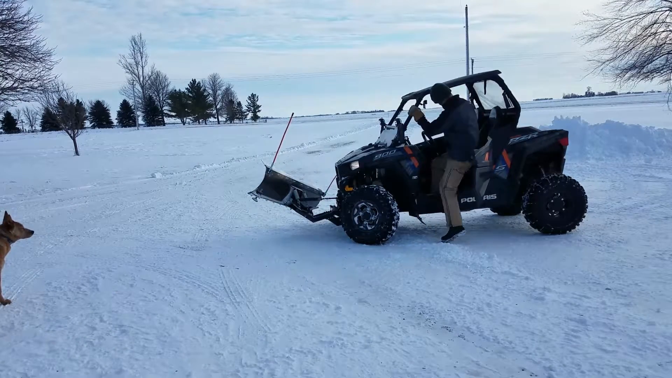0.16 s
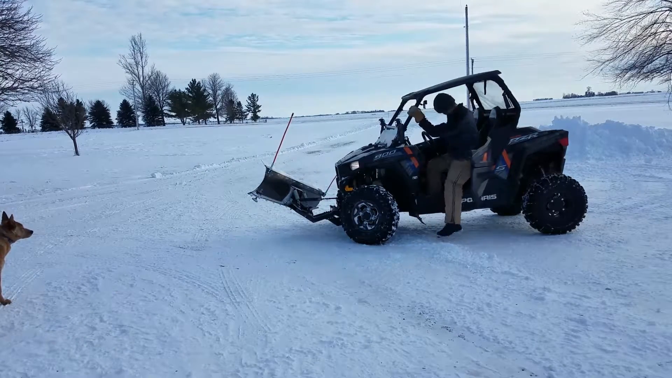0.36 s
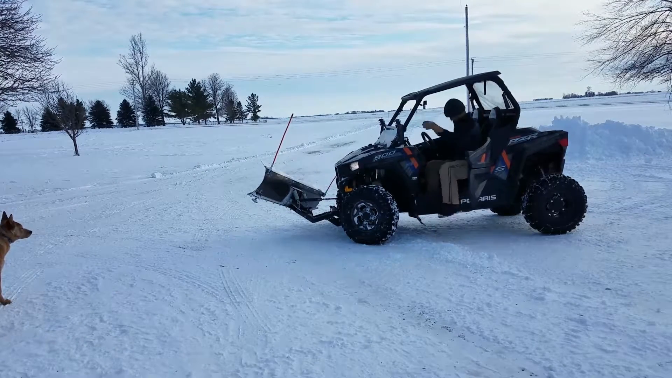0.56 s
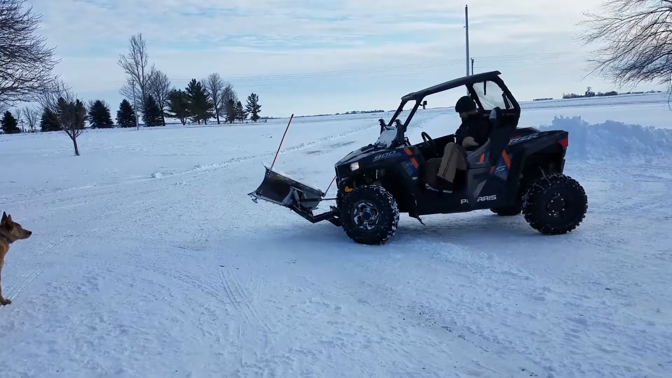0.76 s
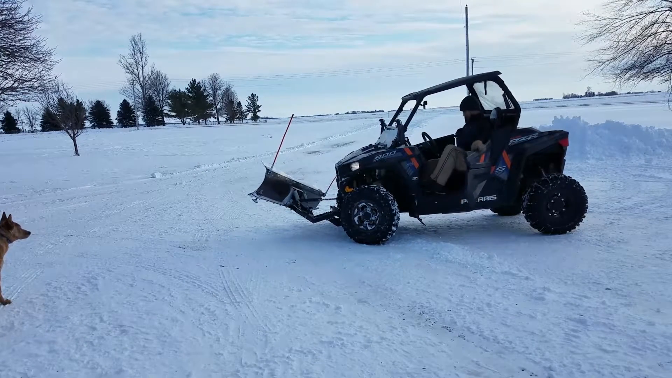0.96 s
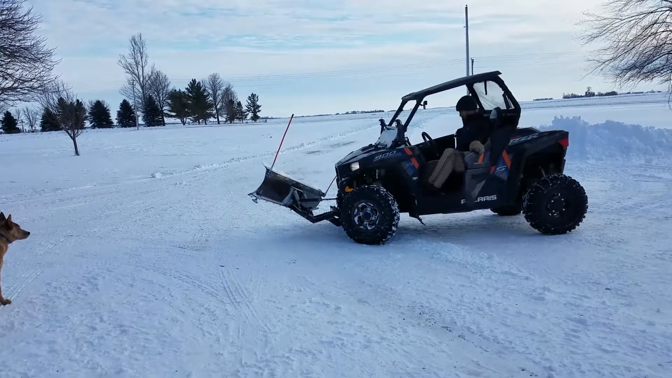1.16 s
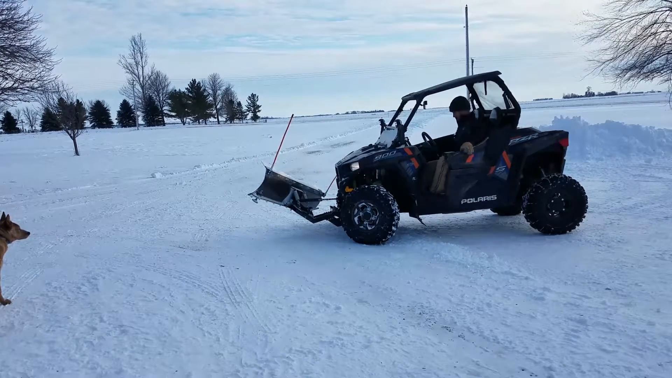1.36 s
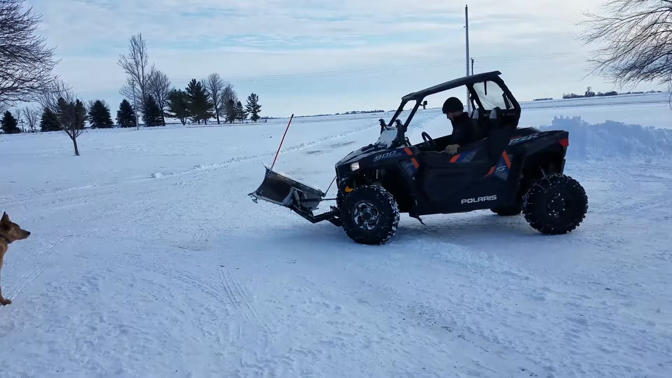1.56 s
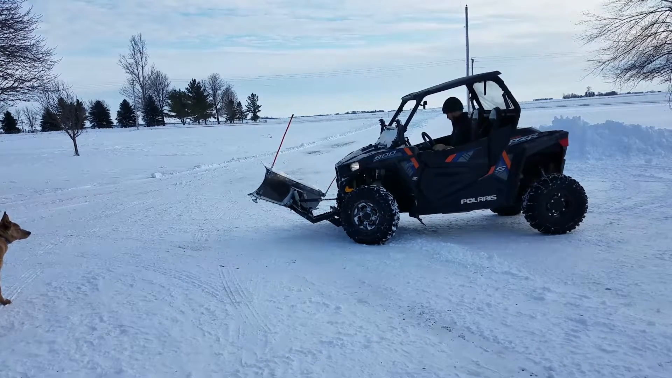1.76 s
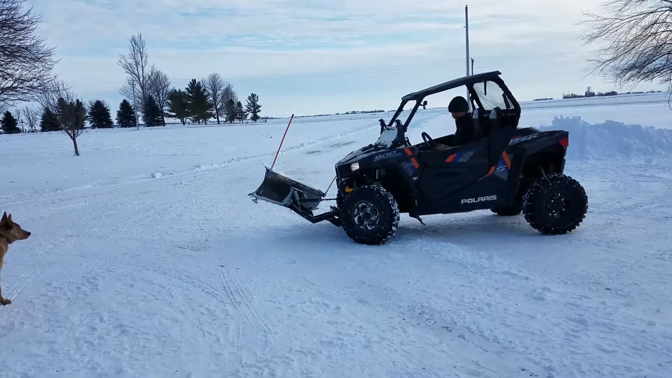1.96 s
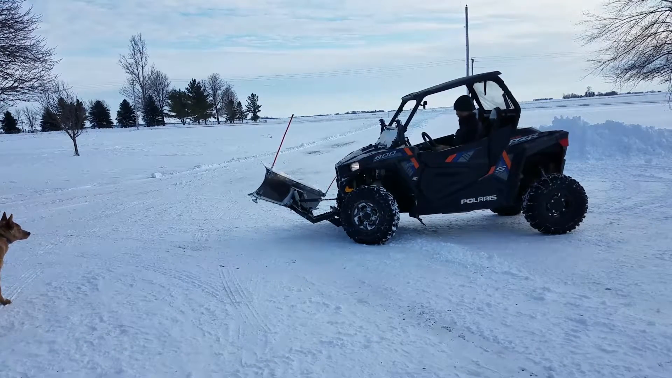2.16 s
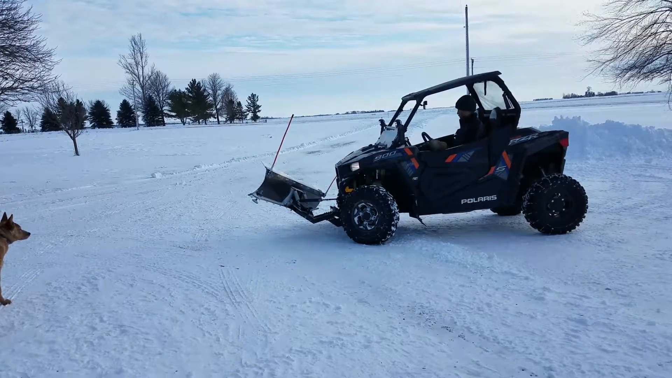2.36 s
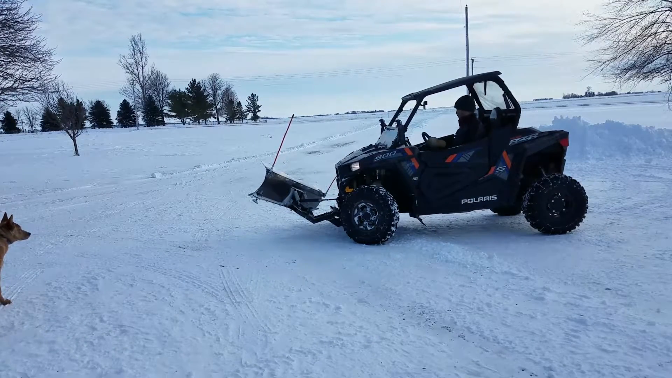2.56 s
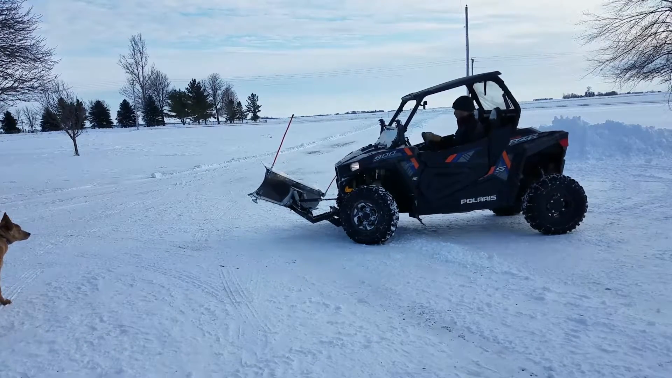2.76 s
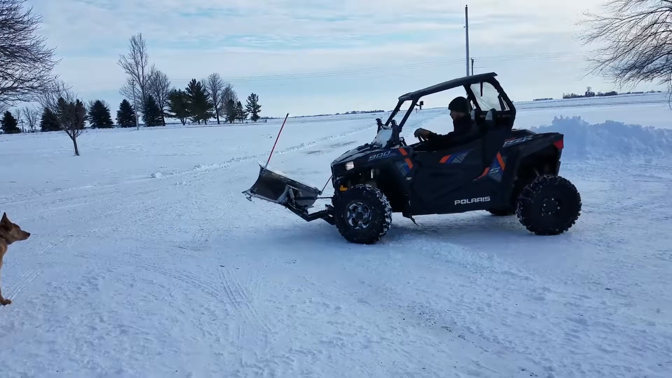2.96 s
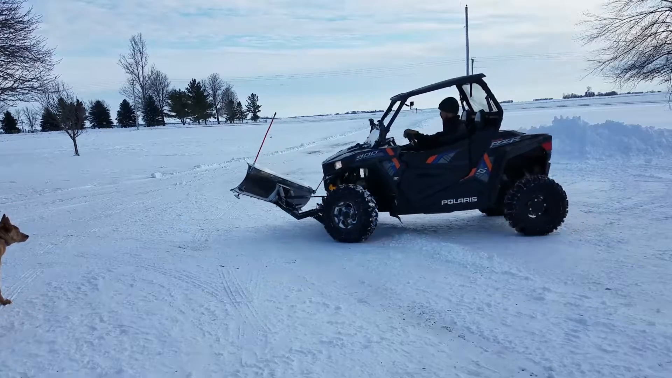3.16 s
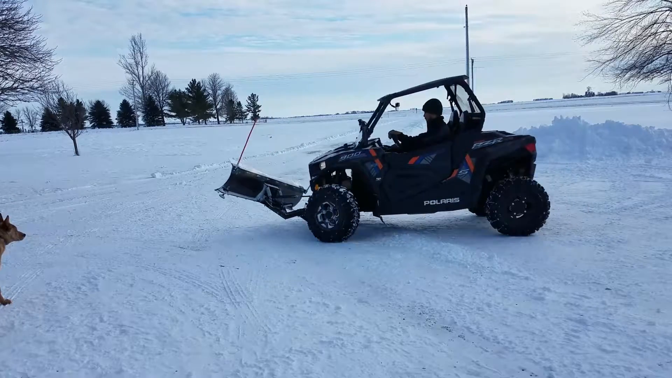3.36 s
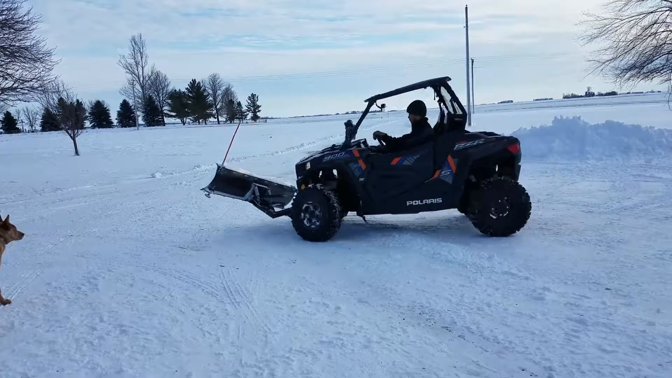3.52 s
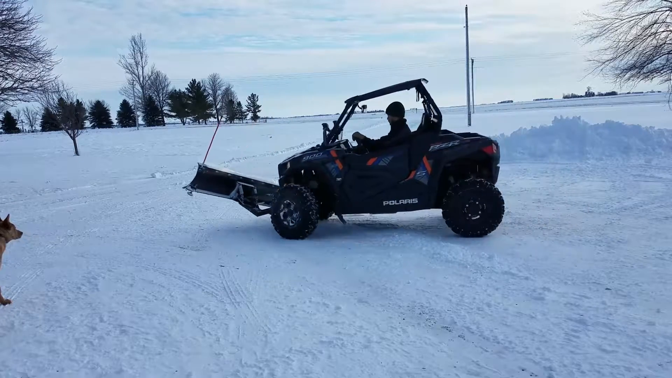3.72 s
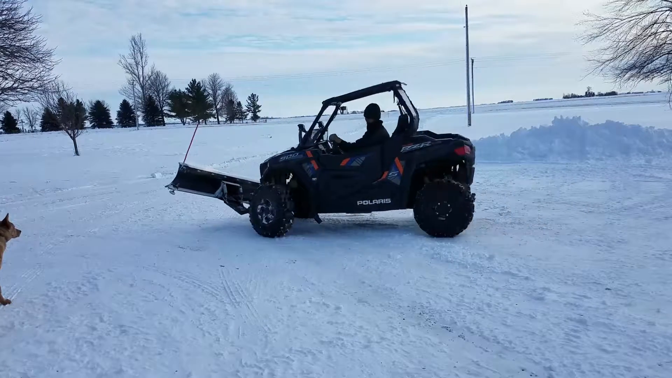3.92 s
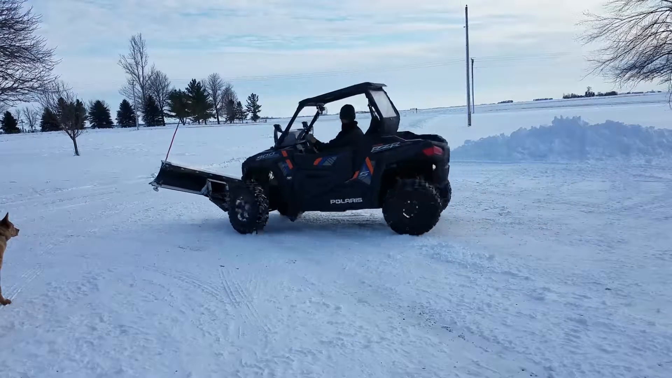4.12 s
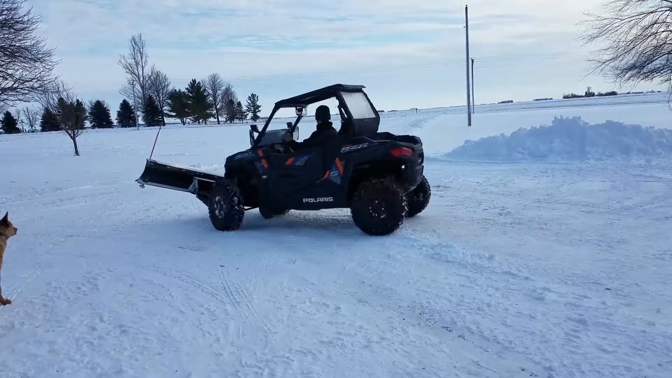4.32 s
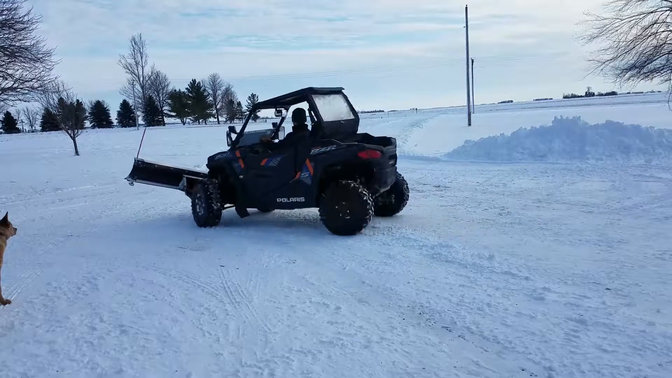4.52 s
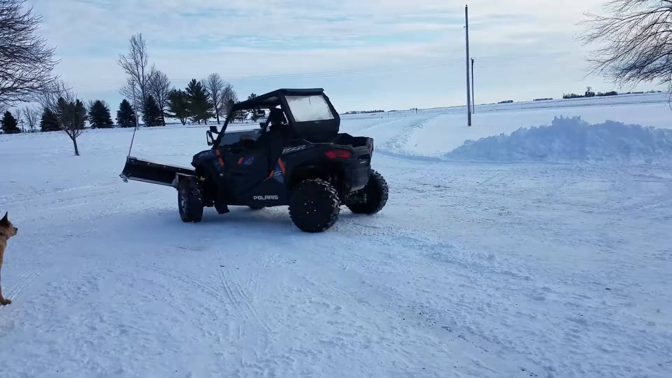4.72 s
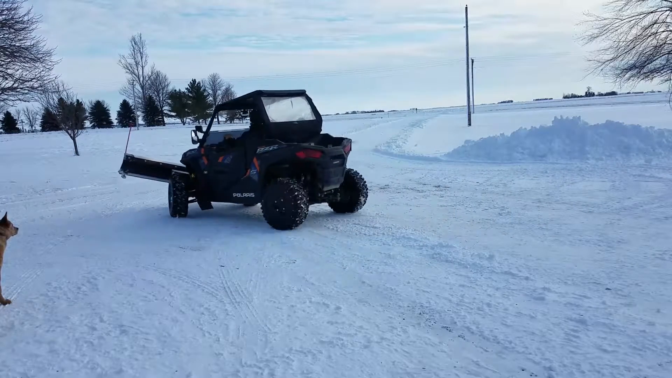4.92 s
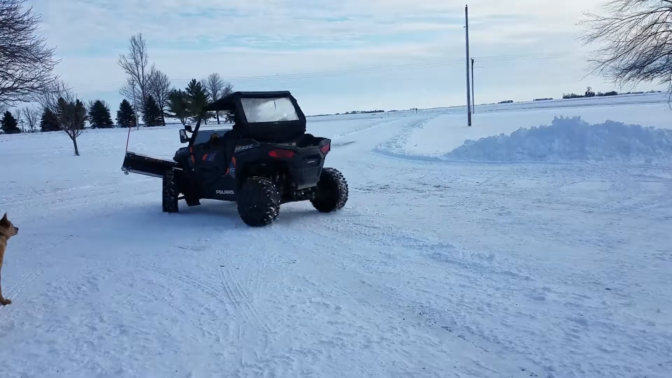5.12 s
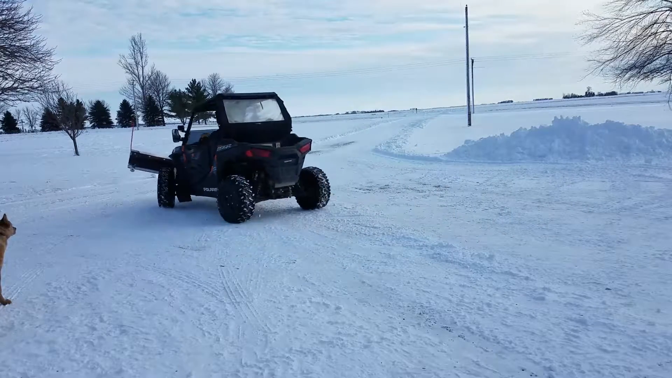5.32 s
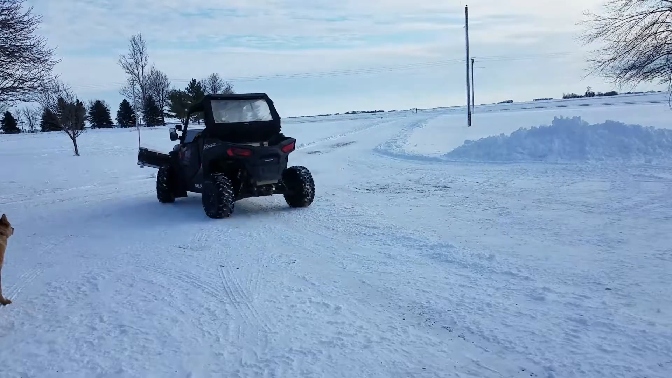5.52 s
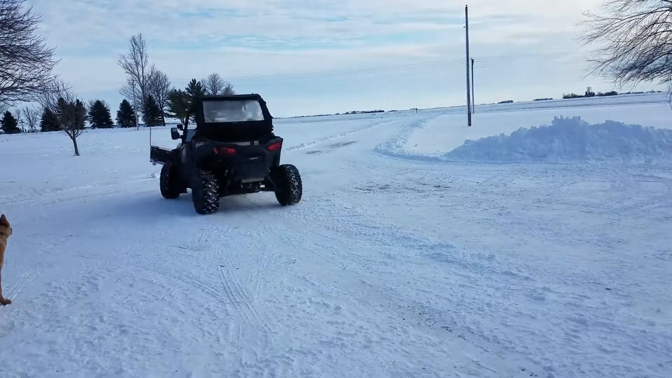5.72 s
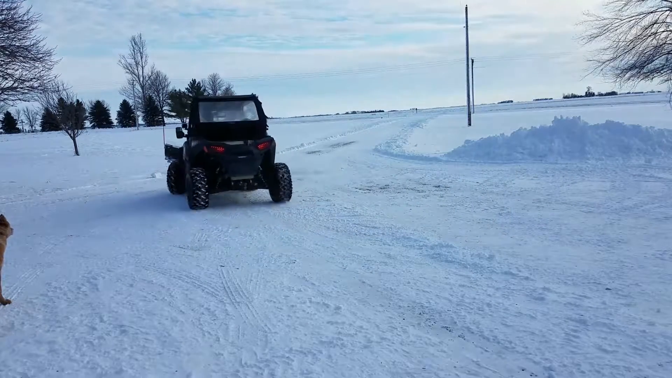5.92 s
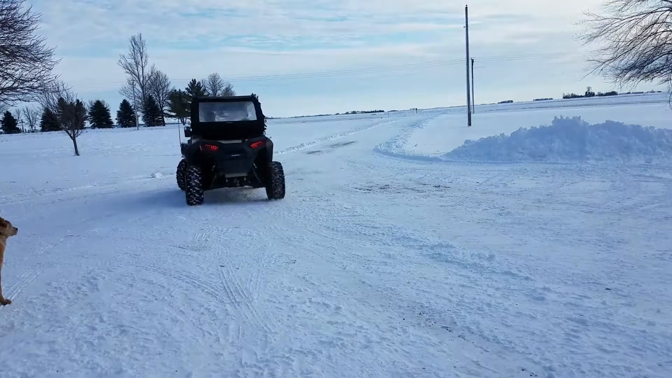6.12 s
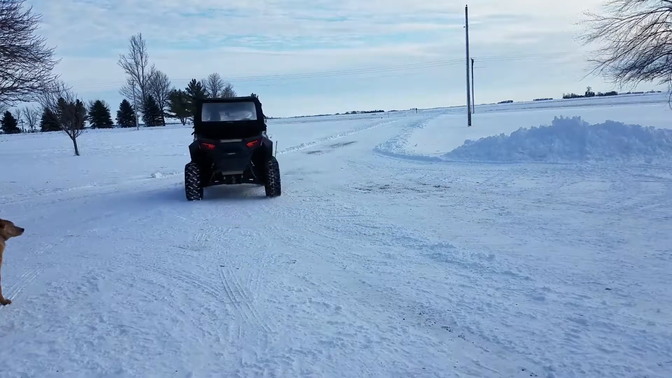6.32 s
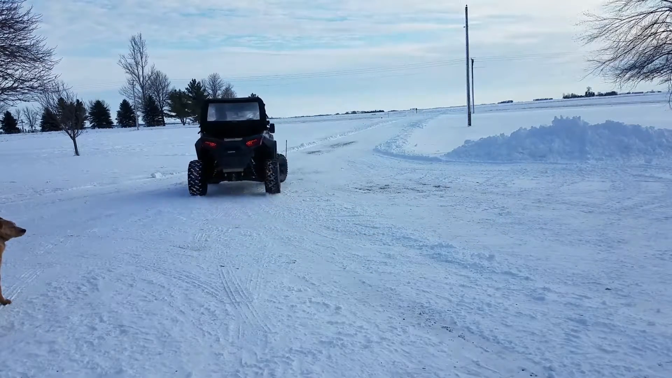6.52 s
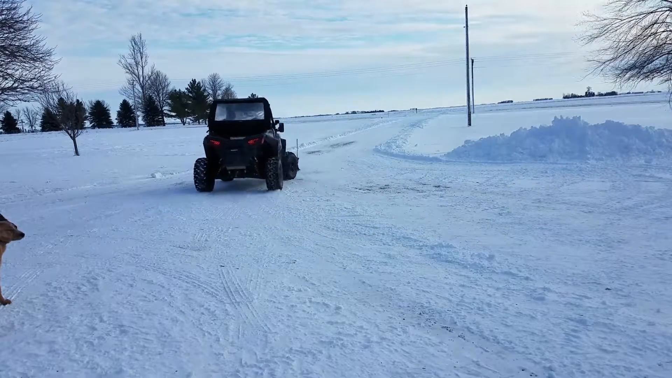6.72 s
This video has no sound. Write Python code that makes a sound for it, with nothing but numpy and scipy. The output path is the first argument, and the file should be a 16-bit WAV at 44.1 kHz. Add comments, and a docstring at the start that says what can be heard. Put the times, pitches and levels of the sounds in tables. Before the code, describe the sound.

Outdoors, a quiet uneven idle putters, a plastic-and-steel door clacks shut, and the engine climbs into a loud, raspy drone while driving off.

```python
"""Utility vehicle drives off in the snow

A two-cylinder vehicle idles in a snowy yard; the driver sits and shuts the door, the engine revs, the
belt clutch grabs, and the vehicle turns its tailpipe to the listener as it drives off.
Timed blows ring pipe and silencer; shaped noise gives clatter, tyres, hiss and wash; shakes ring the panels.
Two microphone ports hear it, with phase and level differences that change as the vehicle turns.
"""
import sys
import numpy as np
from scipy import signal
from scipy.fft import rfft, irfft, next_fast_len
from scipy.io import wavfile
from scipy.ndimage import uniform_filter1d

SR = 44100
rng = np.random.default_rng(int(sys.argv[2]) if len(sys.argv) > 2 else 0)


def wav_out(sig):
    """Save sig, one row per channel (or a flat mono array), as 16-bit PCM at SR to the path in sys.argv[1]."""
    wavfile.write(sys.argv[1], SR, np.round(np.clip(np.atleast_2d(sig).T, -1, 1) * 32767).astype(np.int16))


N = 303408
T = np.arange(N) / SR

# engine speed, one cycle is two crank turns: time_s, cycles_per_s
SPEED = [(0.0, 10.16), (1.6, 10.12), (1.95, 9.85), (2.24, 10.29), (2.3, 10.91), (2.6, 18.26), (2.8, 22.15),
         (2.86, 22.35), (3.16, 21.9), (3.31, 22.15), (3.56, 24.9), (3.9, 30.84), (4.1, 31.95), (4.2, 31.68),
         (4.4, 32.4), (4.55, 33.95), (4.68, 34.06), (4.92, 35.15), (5.06, 35.4), (5.24, 34.45),
         (5.4, 34.49), (5.72, 33.5), (5.8, 33.66), (5.96, 33.3), (6.2, 34.14), (6.36, 35.39), (6.6, 36.55),
         (6.7, 37.35), (6.88, 38.15)]


def engine():
    """Crank angle in cycles, the blows of both cylinders, their pipe echoes, and the puffing between them."""
    # cycle angle at which the first exhaust valve blows: time_s, angle_cycles
    blow_angle = [(0, .012), (1.14, .002), (2.04, .019), (2.41, -.027), (2.6, -.073), (2.93, -.112),
                  (3.24, -.114), (3.62, -.136), (4.41, -.195), (4.7, -.22), (5.07, -.254), (5.42, -.245),
                  (5.93, -.218), (6.5, -.238), (6.88, -.24)]
    # echoes of each blow, delay before division by the note factor: delay_s, signed_share
    idle_echoes = [(.0132, .66), (.0168, .89), (.0275, .29)]
    load_echoes = [(.01, 1), (.0132, -.49), (.0215, .29)]
    # echoes under load: time_s, level_db
    load_echo_level = [(2.3, -4), (2.6, -9), (2.95, -8), (3.25, -5), (3.65, -14.5), (4.4, -7), (4.7, -5.5),
                       (5.1, -4), (5.45, -0.5), (5.95, -3), (6.88, 4.5)]
    start_cycles, second_after_cycles = .385, .25
    unevenness_cycles = .0012
    idle_late_s, load_early_s = .001, .0007  # shift of the second blow
    second_idle_db, second_load_db = -3.2, -3.5  # second cylinder against the first

    speed, factor = curve(SPEED), pipe_note_factor()
    load = ramp(2.3, .2)
    cycles = start_cycles + np.cumsum(speed) / SR
    first = cycles - curve(blow_angle) + unevenness_cycles * wander(0.038)
    second = first - second_after_cycles + (load_early_s * load - idle_late_s * (1 - load)) * speed
    second_db = second_idle_db + (second_load_db - second_idle_db) * load
    load_echo_gain = amp(curve(load_echo_level))

    blows, echoes, puffs = [], np.zeros(N), np.zeros(N)
    for angle, level_db in ((first, 0), (second, second_db)):
        burn = amp(0.7 * rng.standard_normal(400))  # no two burns alike

        def fired(shifted):
            count = shifted // 1
            starts = np.diff(count, prepend=count[0]) > 0
            return amp(level_db) * starts * burn[count.astype(int)]

        def echoed(table):
            return sum(share * fired(angle - delay_s / factor * speed) for delay_s, share in table)

        blows.append(fired(angle))
        echoes += (1 - load) * echoed(idle_echoes) + load * load_echo_gain * echoed(load_echoes)
        puffs += np.exp(-(angle % 1) / .35)
    return cycles, blows, echoes, puffs


def exhaust(cycles, blows, echoes, puffs):
    """Blows ring the pipe, whose notes vary with engine speed, and the silencer chambers, whose notes stay fixed."""
    # exhaust level: time_s, level_db
    level = [(0, -32), (2.25, -32), (2.55, -23), (2.8, -19.5), (3.05, -19.5), (3.35, -20.5), (3.6, -18.5),
             (4.05, -17), (4.6, -19.5), (5.08, -19), (5.75, -21.5), (6.35, -20), (6.88, -21.5)]
    # rear outlet and side wall relative to the exhaust level as the vehicle turns: time_s, level_db
    outlet_level = [(0, -49), (2.3, -70), (2.6, -23.5), (3.3, -30.5), (3.6, -14), (4.05, -26), (4.4, -6.5),
                    (4.85, -5), (5.08, -8.5), (5.3, -8), (6.1, -8.5), (6.4, -11), (6.88, -9)]
    wall_level = [(0, -33.5), (2.4, -32.5), (2.7, -26.5), (3.8, -18.5), (4.35, -5), (4.7, -21),
                  (5.2, -14.5), (5.75, -14.5), (6.0, -15), (6.4, -22.5), (6.88, -11)]
    # pipe before the note factor, and its overtone of opposite sign: pitch_hz, width_hz, level_db
    pipe_mode = [(82.2, 14.7, 0)]
    overtone_mode = [(223.5, 10, -.5)]
    # silencer shell, fixed note: pitch_hz, width_hz, level_db
    shell_mode = [(324, 100, 0)]
    # silencer chambers at the rear outlet and through the side wall: pitch_hz, width_hz, level_db
    outlet_modes = [(318.9, 30, 6), (647.6, 26, 4), (726.4, 34, 9.5), (781, 67, 2.5), (1810, 87, -52),
                    (2565, 70, -17.5), (1210, 28, -4.5), (1527, 120, -18)]
    wall_modes = [(409, 52, -8), (840.6, 21.4, 7.5), (935, 63, -0.5), (1595, 39, -7.5), (2030, 36, -16),
                  (520, 42, 2), (1345, 75, -10.5)]
    # thump and shell before the levelling: time_s, thump_db, shell_db
    thump_levels = [(0, -4, -10), (2.25, -4.7, -13), (2.6, -0.5, 5.5), (2.95, 2.2, -24), (3.25, 0.5, -25),
                    (3.65, -2.3, -1.5), (4.05, 4.5, -4), (4.4, 18, 8), (4.7, 9.5, 4.5), (5.1, 5, -21.5),
                    (5.45, 4, -4), (5.95, 4.5, 2), (6.5, 6.5, -19), (6.88, 13.5, -9)]
    valve_opening_s, shell_late_s = .005, .003
    base_thump_hz, thump_width_hz = 169.6, 168  # pitch before the note factor
    note_waver, turbulence = .008, .055

    soft = signal.oaconvolve(sum(blows) + echoes, np.hanning(round(valve_opening_s * SR)))[:N]
    factor = pipe_note_factor() * (1 + note_waver * wander(0.076))
    time_s, thump_db, shell_db = np.transpose(thump_levels)
    # the blow itself leaving the pipe
    thump = amp(np.interp(T, time_s, thump_db)) * resonate(soft, base_thump_hz * factor, thump_width_hz)
    late_shell = np.interp(T - shell_late_s, T, chambers(soft, shell_mode))
    shell = amp(np.interp(T, time_s, shell_db)) * late_shell
    notes = through(soft, pipe_mode, factor) - through(soft, overtone_mode, factor)
    pipe = steady(below(notes + thump + shell, hz=427), cycles)

    crack = steady(blows[0] + amp(6.5) * blows[1], cycles)  # the nearer header cracks louder
    gas = crack + turbulence * (2.0 + puffs) * rng.standard_normal(N)
    outlet = steady(chambers(gas, outlet_modes), cycles)
    wall = steady(chambers(gas, wall_modes), cycles)
    mix = pipe + amp(curve(outlet_level)) * outlet + amp(curve(wall_level)) * wall
    return amp(curve(level)) * mix


def spit(blows):
    """A short hiss of gas leaves the tailpipe after each blow, weaker with speed. Two unrelated paths."""
    # gas hiss: pitch_hz, level_db (per Hz, relative)
    spectrum = [(1500, -54), (3000, -18.5), (5300, -21), (7000, -18), (9500, -28), (12500, -23),
                (15500, -19)]
    idle_db, db_per_octave = -59.5, -28
    late_s, rise_s, fade_s = 0.021, 0.0022, .018
    age_s = np.maximum(T[:SR // 8] - late_s, 0)
    burst = (1 - np.exp(-age_s / rise_s)) * np.exp(-age_s / fade_s)
    gate = signal.oaconvolve(sum(blows), burst)[:N]
    level_db = idle_db + db_per_octave * octaves_above_idle()
    return amp(level_db) * gate * coloured(rng.standard_normal((2, N)), spectrum)


def chuff(blows):
    """The valve gear chuffs in its cover, starting just before each first-cylinder blow. Two paths."""
    # valve cover: pitch_hz, width_hz, level_db
    cover_modes = [(730, 300, 2), (1450, 147, 4.5), (2026, 180, -6)]
    idle_db, db_per_octave = -48.5, 6.5
    early_s, fade_s = .008, 0.0089
    gate = signal.oaconvolve(blows[0], np.exp(-T[:SR // 10] / fade_s))[:N]
    early_gate = np.interp(T + early_s, T, gate)
    level_db = idle_db + db_per_octave * octaves_above_idle()
    return amp(level_db) * early_gate * evened(chambers(rng.standard_normal((2, N)), cover_modes))


def running_noise(puffs):
    """Valve gear clatters in the casing with each puff; tyres on snow and the belt rush. Two unrelated paths."""
    # relative spectra: pitch_hz, level_db (per Hz)
    clatter_spectrum = [(150, 19), (450, 14), (750, -15.5), (1000, 12.5), (1400, 10.5), (2000, 0.5),
                        (2800, -7), (3900, -11), (5500, -15), (6600, -15.5), (7800, -12), (9500, -30),
                        (11500, -22), (14500, -15)]
    rolling_spectrum = [(300, -24.5), (900, -4.5), (1300, -17.5), (1700, -11.5), (2500, -16), (3300, -12.5),
                        (4000, -17), (4800, -16.5), (5500, -22.5), (6500, -21.5), (7900, -20.5),
                        (9400, -32), (11500, -29), (15000, -25.5)]
    # casing: pitch_hz, width_hz, level_db
    casing_modes = [(734, 260, 6), (1125, 40, 1.5), (1426, 27, 5.5), (2020, 64, -9), (2970, 150, -13)]
    idle_clatter_db, clatter_db_per_octave = -49.5, 11
    shadow_db = -4.5 * ramp(5.2, 0.038)  # the body hides the casing once the tail points here
    roll_s, roll_rise_s, roll_from_db, roll_to_db = 2.6, 1.7, -69, -40  # tyres and belt gather speed
    steady_share, ticks_per_s = .8, 900

    clatter_db = idle_clatter_db + clatter_db_per_octave * octaves_above_idle() + shadow_db
    rolling_db = roll_from_db + (roll_to_db - roll_from_db) * ramp(roll_s, roll_rise_s)
    noise = rng.standard_normal((3, 2, N))
    tick_gain = amp(1.7 * np.minimum(rng.exponential(1, N), 2))
    ticks = tick_gain * (rng.random(N) < ticks_per_s / SR) * noise[2]
    rattle = (steady_share + puffs) * (noise[0] + 0.7 * evened(ticks))
    clatter = coloured(rattle, clatter_spectrum) + amp(-4.5) * evened(chambers(rattle, casing_modes))
    rush = coloured((10.0 + puffs) * amp(1.54 * wander(0.076)) * noise[1], rolling_spectrum)
    return amp(clatter_db) * clatter + amp(rolling_db) * ramp(roll_s, 0.22) * rush


def whine():
    """Gears and guards sing in narrow bands; each swells unsteadily; most then drop, the last two hold."""
    # bands: start_s, rise_s, end_s, pitch_hz, width_hz, level_db, change_after_end_db
    bands = [(4.3, .6, 6.0, 2985, 60, -45, -8), (4.2, .5, 5.5, 2550, 110, -51, -5),
             (4.72, .15, 5.1, 4470, 90, -50, -25), (4.5, .3, 5.1, 3810, 100, -55, -20),
             (5.05, .2, 5.55, 3570, 110, -52, -10), (6.5, .2, 7, 3190, 50, -53, 0),
             (6.0, .5, 7, 4740, 100, -58, 0)]
    total = np.zeros(N)
    for start_s, rise_s, end_s, hz, width_hz, db, after_db in bands:
        level_db = db + after_db * ramp(end_s, 0.11) + 0.96 * wander(0.084)
        band = evened(chambers(rng.standard_normal(N), [(hz, width_hz, 0)]))
        total += ramp(start_s, rise_s) ** 2 * amp(level_db) * band
    return total


def knocks():
    """Short shakes of loose parts ring the panels, snap in the treble and ring the latch. Two paths."""
    # shakes: start_s, level_db, fall_30_db_s, treble_share_db, latch_share_of_treble_db
    shakes = [(0.673, -37, 0.046, -34, -8), (0.714, -41, 0.17, -28, -8), (0.896, -43.5, 0.087, -13, -12),
              (1.445, -39, 0.11, -21, 4), (1.631, -25.5, 0.047, -3, -21), (1.642, -15, 0.068, -15, 0),
              (1.661, -24.5, 0.067, -17, 3), (1.703, -25, 0.037, -18, -4), (1.715, -36, 0.043, -12, 4),
              (1.734, -42, .06, -11, 7), (1.874, -38, 0.18, -17, 3), (2.734, -22.5, 0.059, -17, -12)]
    # damped plastic and tube: pitch_hz, level_db, ring_s (width_hz = 6 / ring_s)
    panels = [(81.6, 2, 0.37), (119, 13, 0.38), (167, -5, .12), (186, 19.5, 0.24), (240, 0, 0.1),
              (269, 13, 0.14), (270, 4.5, 0.22), (413, -31, 0.25), (575, -11, 0.17), (662, 5, 0.12),
              (677, 5, 0.076), (734, 6, 0.16), (837, 3.5, 0.11), (936, -23, .1)]
    # treble snap: pitch_hz, level_db (per Hz, relative)
    snap_spectrum = [(300, -65), (1200, 5), (2200, -3), (3500, 1), (5200, -6.5), (7500, -4), (10000, -13.5),
                     (15000, -13)]
    # steel latch: pitch_hz, width_hz, level_db
    latch_modes = [(1550, 580, 3), (2100, 730, 1), (2650, 490, -2), (5140, 330, -8), (7500, 250, -16)]

    dull, bright, steel = np.zeros((3, N))
    for start_s, db, fall_s, treble_db, latch_db in shakes:
        age_s = np.maximum(T - start_s, 0)
        fall_db = 60 * np.minimum(age_s / (2 * fall_s), 3)
        shake = amp(db - fall_db) * (1 - np.exp(-age_s / 0.0011))
        dull += shake
        bright += amp(treble_db) * shake
        steel += amp(treble_db + latch_db) * shake
    noise = rng.standard_normal((3, N))
    modes = [(hz, 6 / ring_s, db) for hz, db, ring_s in panels]
    power = sum(amp(2 * db) * np.pi * width_hz / SR for _, width_hz, db in modes)
    ring = through(dull * noise[0], modes) / np.sqrt(power)
    snap = bright * coloured(noise[1:], snap_spectrum)
    latch = steel * evened(chambers(noise[1:], latch_modes))
    return below(ring, hz=1590) + snap + latch


def air_wash():
    """Low wash of air: shaped steady noise on two unrelated paths."""
    # pitch_hz, level_db (per Hz, relative)
    spectrum = [(18, -11), (30, 10), (50, -15), (90, 14.5), (250, 8), (600, -23), (2000, -93)]
    return amp(-42.5) * coloured(rng.standard_normal((2, N)), spectrum)


def recorder_hiss():
    """Steady recorder hiss: shaped noise on two unrelated paths."""
    # pitch_hz, level_db (per Hz, relative)
    spectrum = [(1470, -30), (2500, -2), (3300, -6), (4160, -8), (5320, -17), (7710, -14.5), (9280, -22),
                (15100, -10), (15800, -21)]
    return amp(-66.5) * coloured(rng.standard_normal((2, N)), spectrum)


def ports(direct, scattered):
    """The right port hears a turned phase and, in the treble, mostly sound scattered on another path."""
    # likeness of the ports: pitch_hz, likeness
    likeness = [(300, 1), (600, .96), (1000, .9), (2000, .5), (4000, .4), (8000, .3), (14000, .15)]
    # phase by which left leads, side-on then tail-on: pitch_hz, lead_rad
    side_lead = [(300, -.1), (780, -.3), (1030, -3.0), (1700, -3.1), (2150, -6.2), (3100, -9.3)]
    tail_lead = [(100, .1), (400, .3), (850, .3), (1000, -2.8), (1400, -.3), (1700, -.8), (2000, .8),
                 (3000, 1.2), (3400, 2)]
    # left minus right, side-on then tail-on: pitch_hz, level_db
    side_left = [(300, -1.53), (740, 4), (1300, -2.5), (2000, -1.5), (3300, 2), (9000, 2), (14000, -3.5)]
    tail_left = [(300, -2), (740, -1), (2000, -3.5), (3300, -2.5), (9000, 1), (14000, -4.5)]

    size = next_fast_len(N + SR // 4)
    hz = np.fft.rfftfreq(size, 1 / SR)
    same = np.clip(read(likeness, hz), 0, 1)
    left = rfft(direct, size)
    right = same * left + np.sqrt(1 - same ** 2) * rfft(scattered, size)

    def pair(lead, left_level):
        gain = amp(read(left_level, hz) / 2)
        turned_right = right * np.exp(-1j * read(lead, hz))
        return irfft(np.array([left * gain, turned_right / gain]), size)[:, :N]

    turned = ramp(4.236, 0.85)  # side-on to tail-on
    return (1 - turned) * pair(side_lead, side_left) + turned * pair(tail_lead, tail_left)


def pipe_note_factor():
    """Factor on the pipe's notes, read from engine speed: lowest just above idle, then mostly rising."""
    # cycles_per_s, pitch_factor
    factor = [(10, 1.2), (14, 1), (18.9, 1.05), (22.2, 1.12), (26.3, 1.41), (32.5, 1.72), (34.3, 1.71),
              (38, 1.76)]
    return np.interp(curve(SPEED), *np.transpose(factor))


def octaves_above_idle():
    """Engine speed in octaves above its starting value."""
    return np.log2(curve(SPEED) / SPEED[0][1])


def resonate(x, hz, width_hz):
    """Shifts the curve hz down to zero, smooths, and shifts back: a resonance of gain 1."""
    turn = np.exp(2j * np.pi * np.cumsum(hz * np.ones(N)) / SR)
    r = np.exp(-np.pi * width_hz / SR)
    return 2 * (turn * signal.lfilter([1 - r], [1, -r], x * turn.conj())).real


def through(x, modes, factor=1):
    """Sums parallel resonances, their pitches scaled by factor."""
    return sum(amp(db) * resonate(x, hz * factor, width_hz) for hz, width_hz, db in modes)


def chambers(x, modes):
    """Each chamber passes its note twice over, in and out: soft attack, dark valleys."""
    return sum(amp(db) * resonate(resonate(x, hz, width_hz), hz, width_hz) for hz, width_hz, db in modes)


def below(x, hz):
    """A steep low-pass: heavy walls pass no treble."""
    return signal.sosfilt(signal.butter(4, hz, fs=SR, output="sos"), x)


def steady(x, cycles):
    """Divides by the rms over a few engine cycles, so the level follows its curve alone."""
    marks = np.arange(0, cycles[-1] + 1)
    energy = np.interp(marks, cycles, np.cumsum(x ** 2) / SR)
    times = np.interp(marks, cycles, T)
    power = uniform_filter1d(np.diff(energy) / (np.diff(times) + 1e-9), size=3)[1:-1]
    return x / np.sqrt(np.interp(T, times[1:-2], power) + 1e-20)


def coloured(x, points):
    """Filters x by a spectrum in dB, rms 1."""
    gain = amp(read(points, np.fft.rfftfreq(N, 1 / SR)))
    return evened(irfft(rfft(x) * gain, N))


def read(points, hz):
    """Interpolates a table along log frequency."""
    f, value = np.transpose(points)
    return np.interp(np.log(hz + 1), np.log(f + 1), value)


def wander(span_s):
    """Slow chance, rms 1."""
    size = round(span_s * SR)
    return evened(uniform_filter1d(uniform_filter1d(rng.standard_normal(N), size), size))


def curve(points):
    """Interpolates a table over time."""
    return np.interp(T, *np.transpose(points))


def ramp(start_s, span_s):
    """0 before start, 1 after start + span."""
    return np.clip((T - start_s) / span_s, 0, 1)


def evened(x):
    """Scales to rms 1."""
    return x / np.sqrt(np.mean(x ** 2) + 1e-20)


def amp(db):
    """Decibels to amplitude."""
    return 10 ** (np.asarray(db) / 20)


def scene():
    """Sums the sources on a direct and a scattered path, heard at two ports."""
    cycles, blows, echoes, puffs = engine()
    low_cut = signal.butter(6, 68, "high", fs=SR, output="sos")  # the recorder hears little deep bass
    boom = signal.sosfilt(low_cut, exhaust(cycles, blows, echoes, puffs))
    noisy = signal.sosfilt(low_cut, running_noise(puffs)) + spit(blows) + chuff(blows)
    noisy = noisy + knocks() + air_wash() + recorder_hiss()
    late_boom = np.interp(T - .004, T, boom)  # late copy of the exhaust for the scattered path
    return ports(boom + whine() + noisy[0], late_boom + noisy[1])


def record(dry):
    """Limits the band with a linear-phase low-pass."""
    edge_hz = 15800
    low_pass = signal.firwin(511, edge_hz, window=("kaiser", 9), fs=SR)
    return signal.oaconvolve(dry, low_pass[None], "same")


dry = scene()
out = record(dry)
wav_out(out)
```